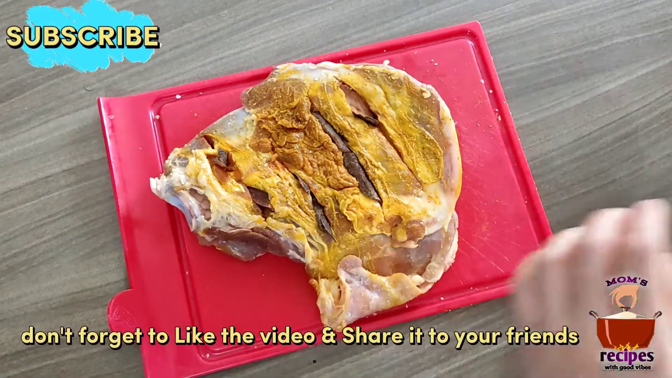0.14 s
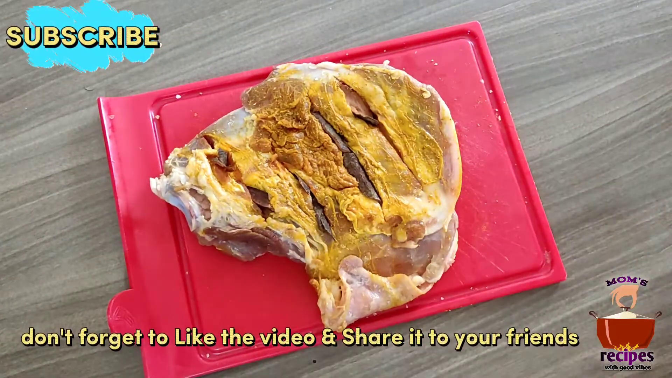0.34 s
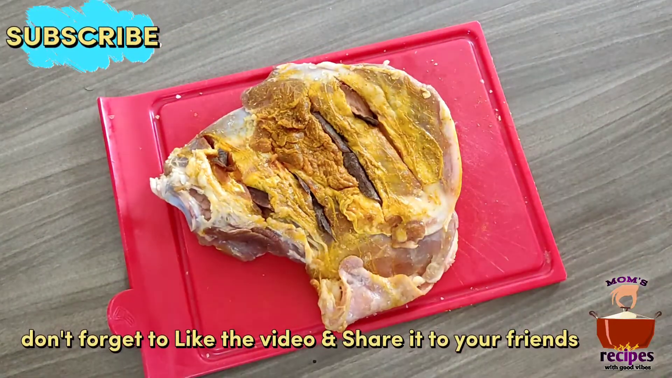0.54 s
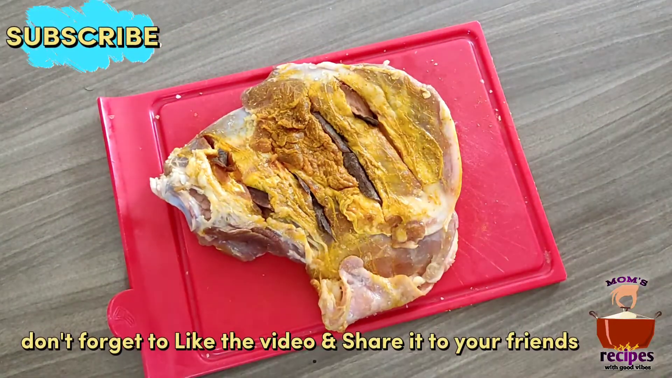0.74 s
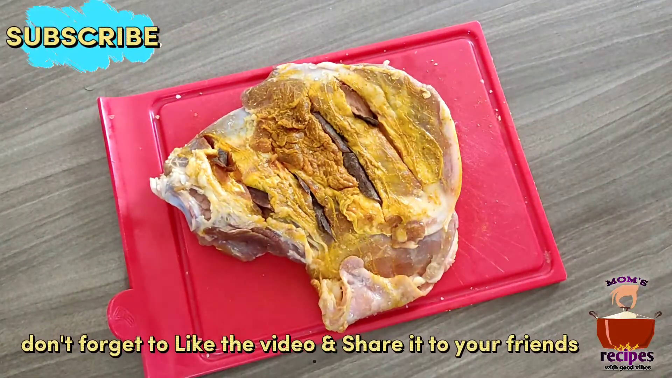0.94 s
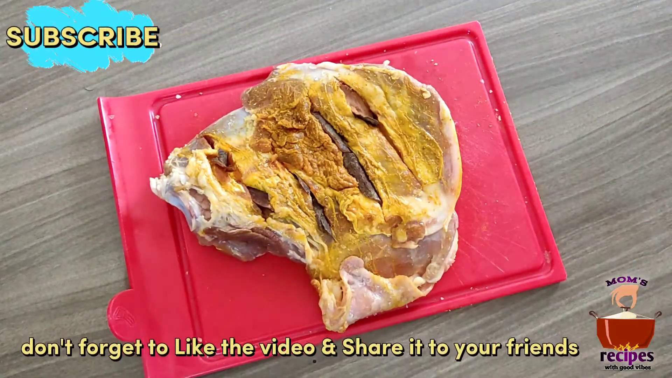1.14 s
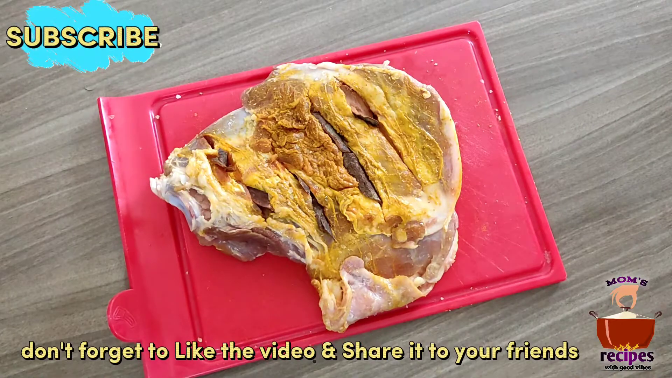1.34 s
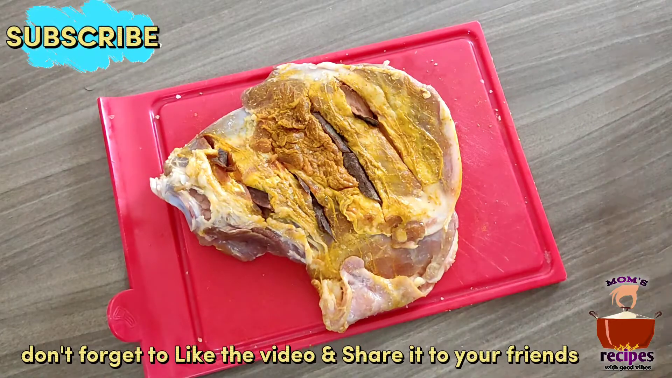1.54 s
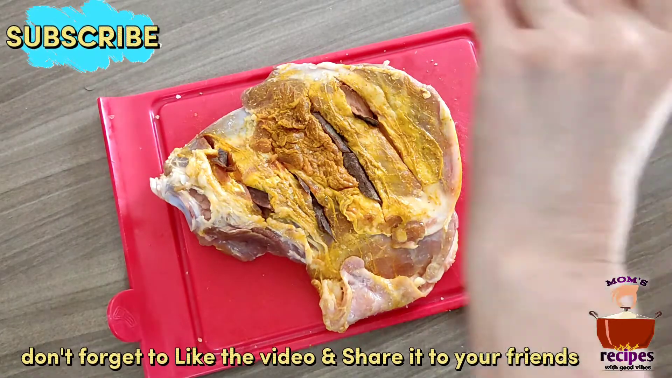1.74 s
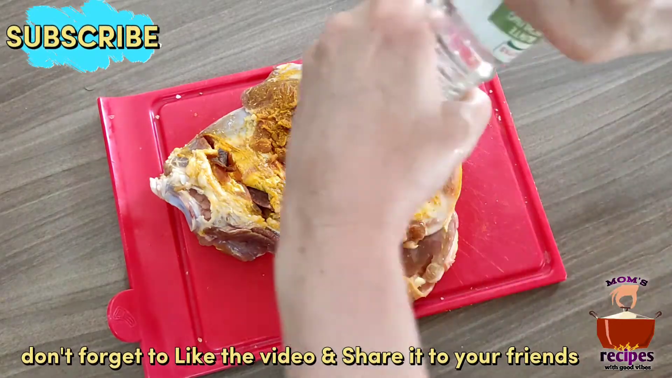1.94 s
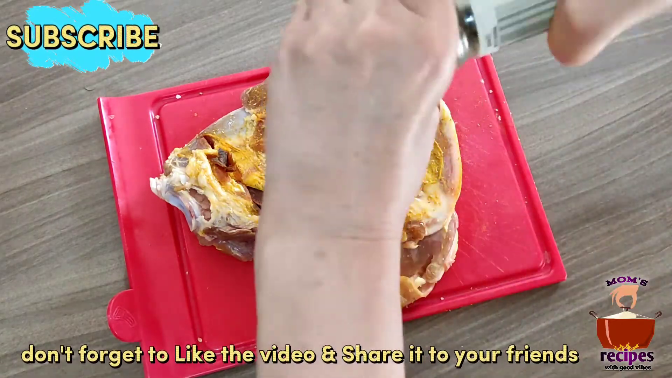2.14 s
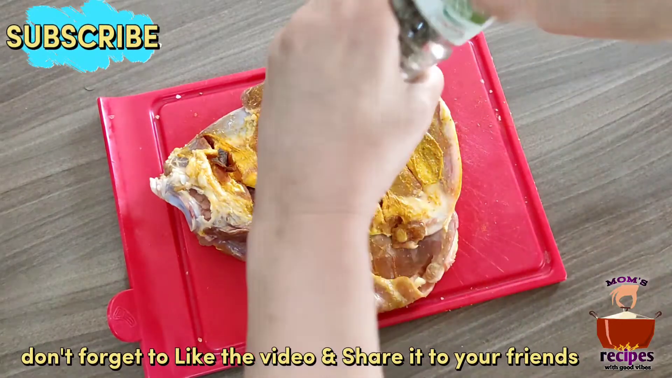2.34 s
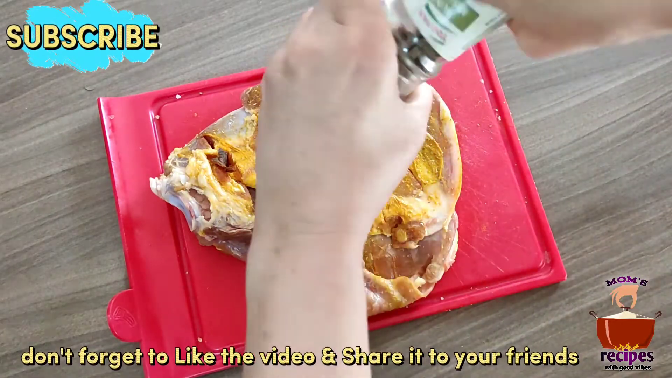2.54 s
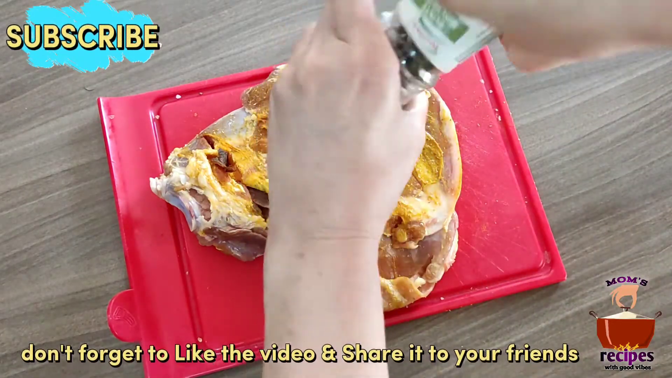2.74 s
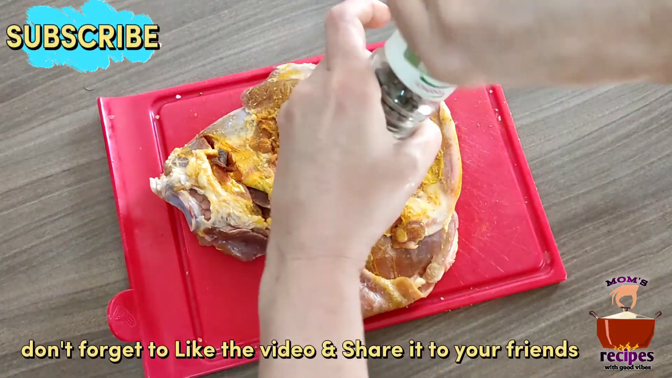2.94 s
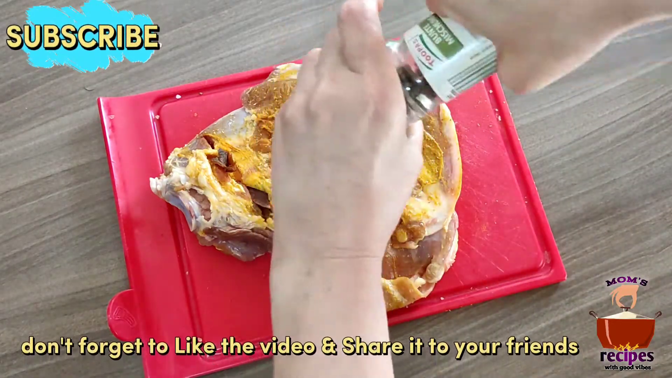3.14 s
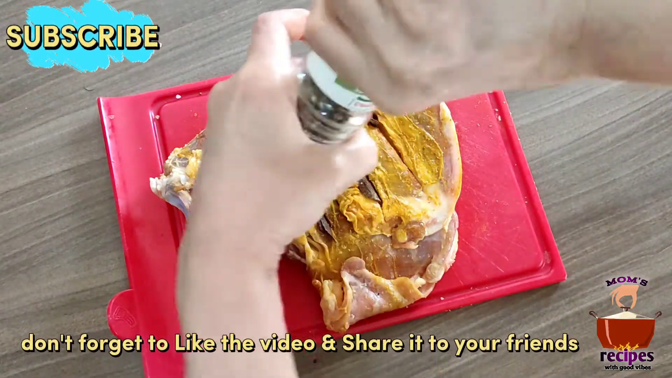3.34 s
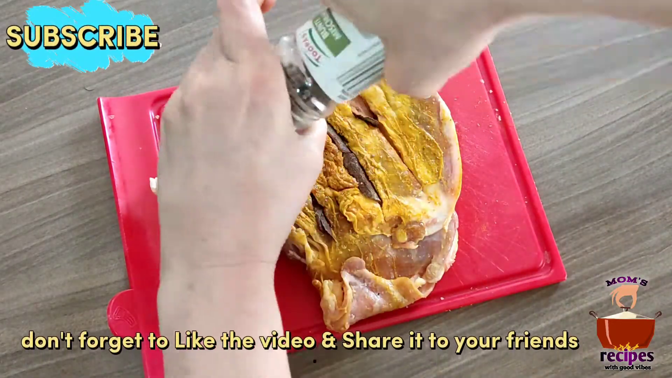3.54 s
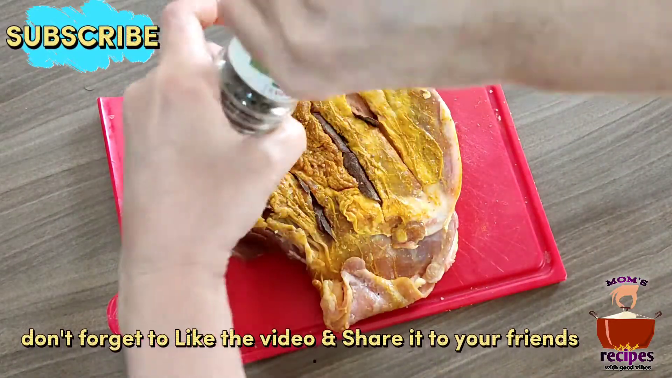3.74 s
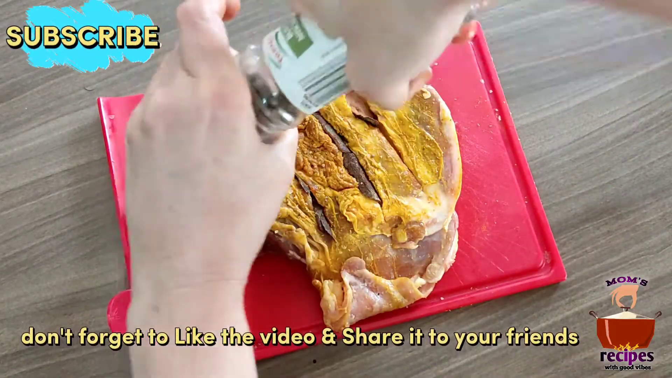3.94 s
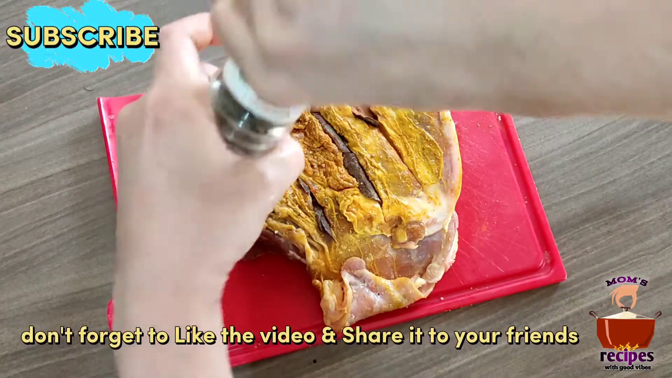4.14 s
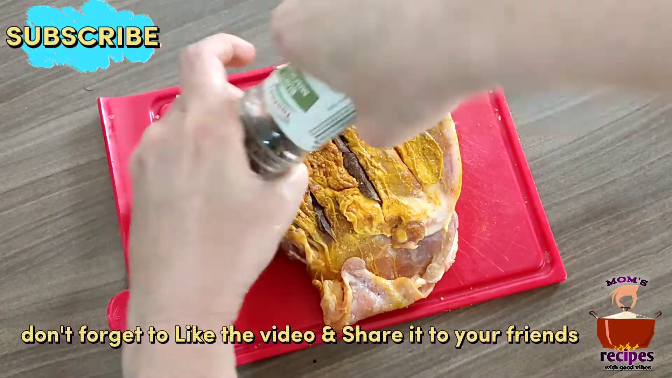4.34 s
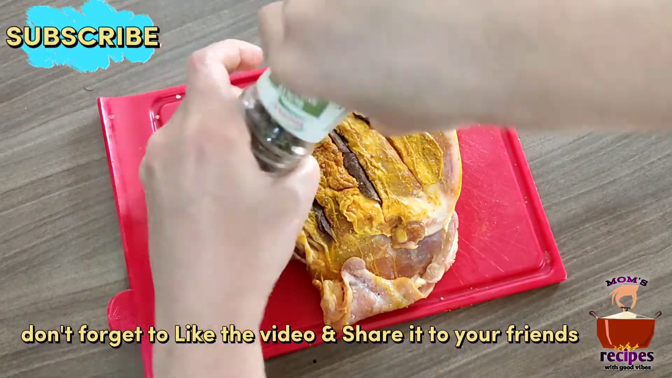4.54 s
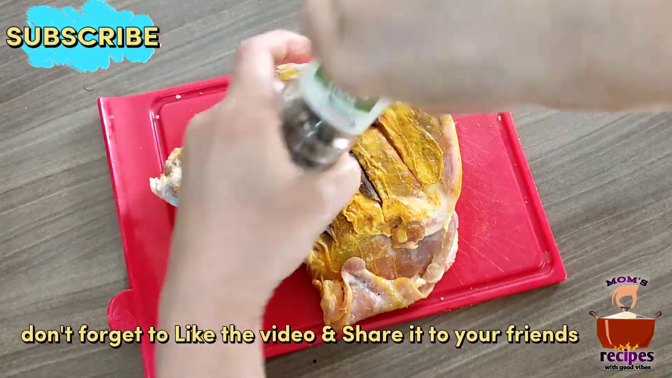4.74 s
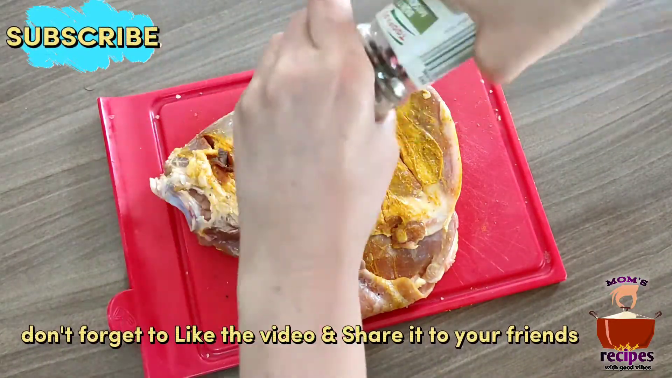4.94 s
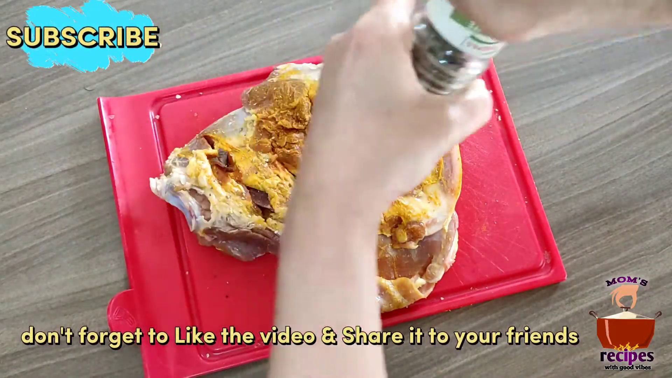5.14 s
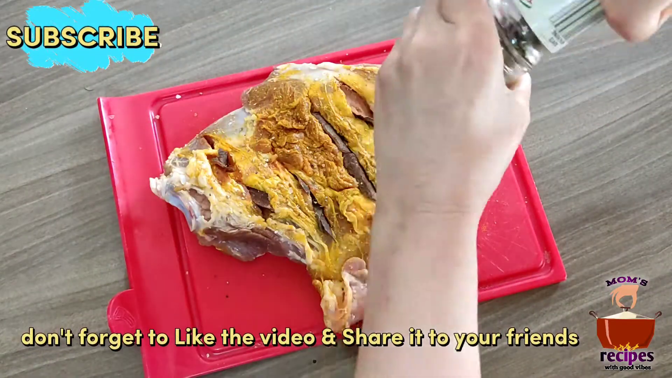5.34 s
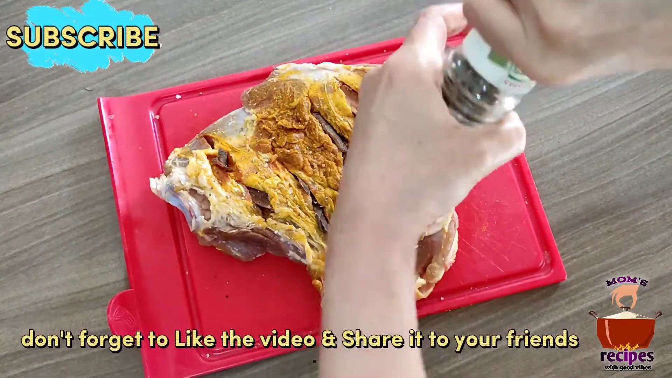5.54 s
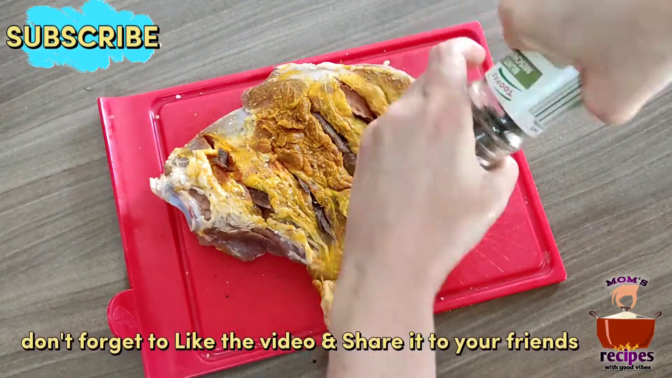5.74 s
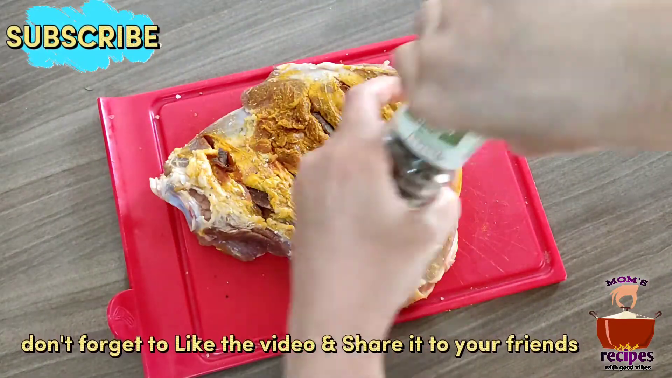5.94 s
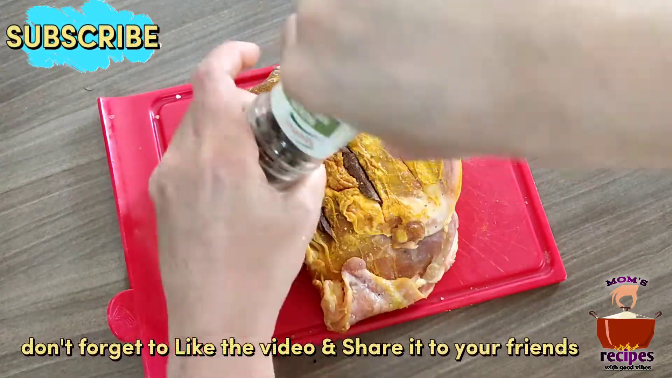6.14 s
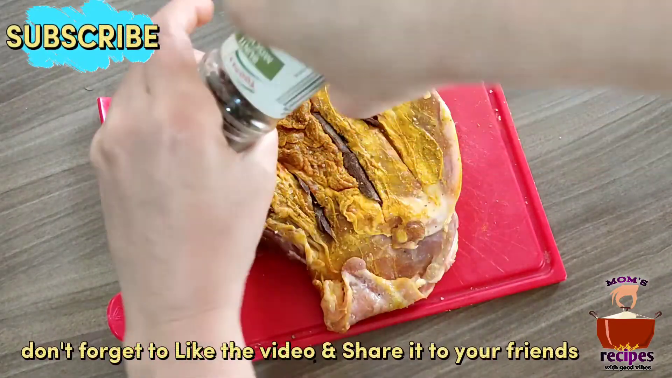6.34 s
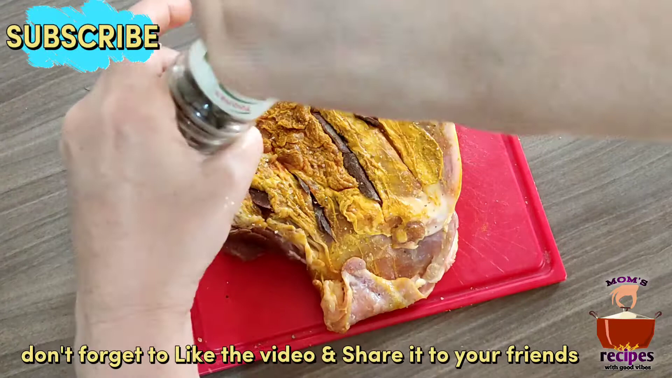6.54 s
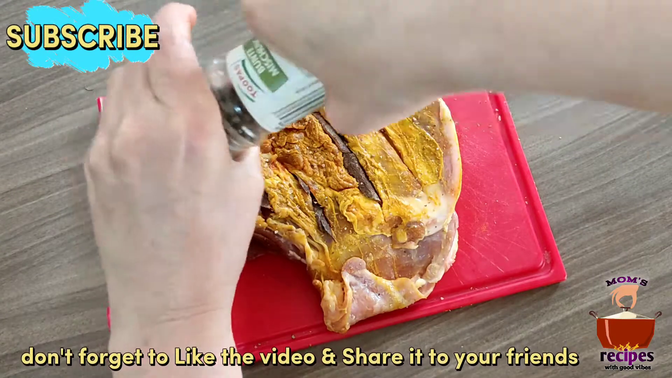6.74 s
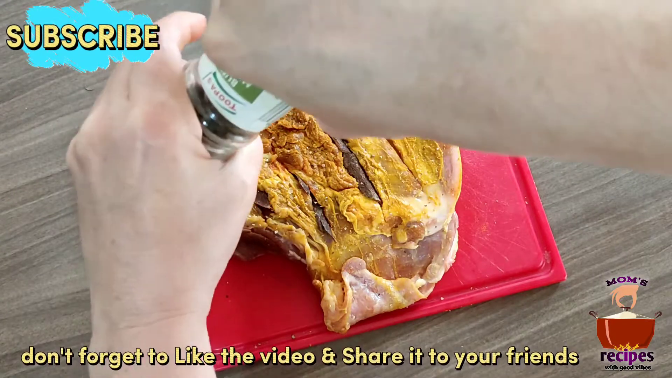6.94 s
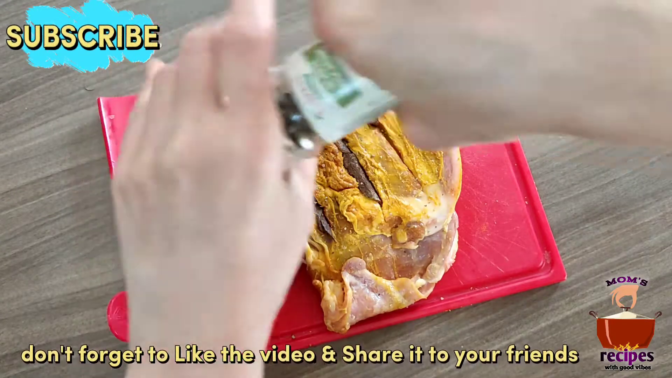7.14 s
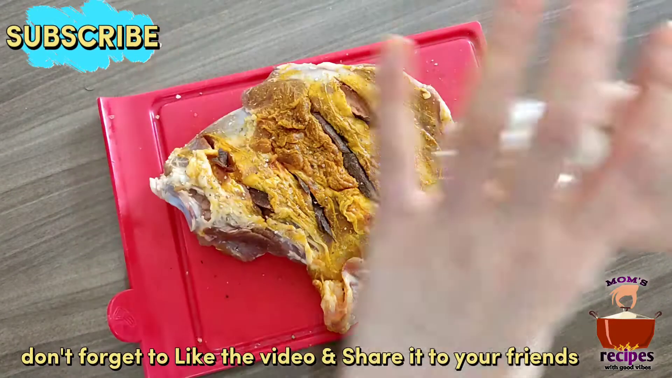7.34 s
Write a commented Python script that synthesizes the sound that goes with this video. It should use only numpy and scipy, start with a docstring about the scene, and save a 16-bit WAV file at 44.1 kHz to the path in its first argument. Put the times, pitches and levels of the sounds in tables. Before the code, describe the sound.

In a small kitchen, something lands with a soft thud on a worktop a little way off, and peppercorns shift faintly in a glass grinder. Then a hand twists the grinder back and forth close to the microphone, making fast, uneven runs of bright, brittle cracks with a fine gritty crunch beneath. The grinding ends with a few faint ticks. Low appliance rumble and slight hiss continue throughout.

```python
"""A hand twists a glass spice grinder over food in a small kitchen, close to a phone's two microphones.
Each peppercorn snaps, rings the plastic burr (the grinding teeth) and knocks the hollow jar, while
the fragments crumble in tiny grains. Before the twisting, something thuds onto a worktop farther off.
The worktop and walls echo, appliances rumble and the microphones hiss."""
import sys
import numpy as np
from scipy import signal
from scipy.fft import rfft, irfft, next_fast_len
from scipy.io import wavfile
from scipy.ndimage import uniform_filter1d

SR = 44100
rng = np.random.default_rng(int(sys.argv[2]) if len(sys.argv) > 2 else 0)


def wav_out(sig):
    """Save sig, one row per channel (or a flat mono array), as 16-bit PCM at SR to the path in sys.argv[1]."""
    wavfile.write(sys.argv[1], SR, np.round(np.clip(np.atleast_2d(sig).T, -1, 1) * 32767).astype(np.int16))


N = 325692

# The tone of the grinder's three sounds. Each row: frequency in Hz, relative level in dB.
SNAP_SPECTRUM = [(4120, -35), (7000, -3.5), (8550, 4), (9690, -4), (10900, -3.5), (12400, -10.5),
                 (13500, -16), (14200, -23), (16500, -75.5)]  # a brittle break, coloured by the ringing microphone openings
BURR_SPECTRUM = [(2290, -25.5), (3900, -16.5), (4830, -9), (5330, -2.5), (5810, 1), (6520, -4),
                 (7000, -4.5), (9100, -32.5), (15400, -120)]  # the plastic teeth
JAR_SPECTRUM = [(240, -48), (400, -28), (663, -12), (715, -15), (802, -9), (1270, -7), (1650, -1.5),
                (2930, -3.5), (3160, -3), (3900, -10), (5070, -13), (8580, -120)]  # the hollow jar and the hands
# How the phone's body shades the grinder. Each row: frequency in Hz, left level minus right in dB.
PHONE_SHADE = [(500, -1.5), (1300, 1.5), (2400, -1), (4400, -1.5), (6000, -2.5), (8500, -10), (10500, -0.5),
               (12500, 3.5), (15000, -5.5)]


def grinder():
    """Cracks and crumbs ring in the same three ways, then reach the two microphones unequally."""
    snap, burr, jar = cracks() + crumble()
    sound = ring(snap, SNAP_SPECTRUM) + ring(burr, BURR_SPECTRUM) + ring(jar, JAR_SPECTRUM)
    return filtered(sound, lambda hz: amp(along(PHONE_SHADE, hz) / 2 * [[1], [-1]]))


# Breaking peppercorns. Each row: start in seconds, snap level in dB, average jar and burr levels in dB
# above the snap, knock pitch in Hz, seconds the snap takes to fade by 60 dB (called t60).
CRACKS = [(1.1308, -34.5, -33, -31, 3510, 0.015), (1.1474, -34, -34, -16, 3250, 0.011),
          (1.1872, -19, -33, -20, 3080, 0.017), (1.5791, -27, -13.5, -16, 2210, 0.017),
          (1.6052, -6.5, -16, -23.5, 2210, 0.012), (1.705, -16.5, -17, -23, 2220, 0.015),
          (1.8545, -26.5, -7.5, -16, 2060, 0.023), (2.0059, -27, -28.5, -33, 1150, 0.013),
          (2.0299, -4.5, -17, -18, 1560, 0.014), (2.0745, -27, -19, -15, 1670, 0.017),
          (2.0808, -14.5, -14, -19, 1880, 0.017), (2.0929, -5.5, -15, -14.5, 1665, 0.013),
          (2.1251, -18.5, -11, -14, 1280, 0.015), (2.1358, -13, -11.5, -13, 1660, 0.015),
          (2.157, -24, -6, -14, 1620, 0.014), (2.1938, -31.5, -12, -7.5, 2010, 0.017),
          (2.2692, -26.5, -9, -21, 3200, 0.017), (2.2796, -17, -13.5, -21, 3130, 0.018),
          (2.3405, -19, -22, -17, 1700, 0.017), (2.3494, -20.5, -16, -19, 2100, 0.014),
          (2.3562, -17.5, -23.5, -18, 1580, 0.023), (2.4259, -30, -23, -21, 2440, 0.017),
          (2.4716, -29, -27, -23, 1980, 0.015), (2.483, -27, -17, -18, 3300, 0.014),
          (2.4939, -17.5, -19, -14, 2400, 0.017), (2.5124, -27, -16, -20, 1970, 0.019),
          (2.5218, -12, -22, -24, 1980, 0.027), (2.5528, -7, -16.5, -20, 2760, 0.021),
          (2.5829, -12, -14, -14.5, 2920, 0.034), (2.6017, -7.5, -16, -12.5, 3170, 0.018),
          (2.6188, -9.5, -13.5, -21, 2090, 0.023), (2.635, -12, -14, -11, 2440, 0.012),
          (2.7186, -33, -15, -9, 1710, 0.019), (2.7343, -25.5, -11, -10, 2390, 0.017),
          (2.7534, -20, -16, -10, 2030, 0.02), (2.761, -6.5, -20, -14.5, 3460, 0.015),
          (2.79, -7, -20, -11.5, 1220, 0.011), (2.9215, -27, -17, -17.5, 1570, 0.014),
          (2.9403, -13.5, -32, -12.5, 1600, 0.023), (2.9821, -23.5, -14, -16, 3200, 0.014),
          (3.028, -1.5, -24.5, -18, 2505, 0.019), (3.0458, -15.5, -20, -19, 2370, 0.012),
          (3.2052, -24.5, -29, -22, 2420, 0.015), (3.2475, -19.5, -32.5, -13, 1200, 0.017),
          (3.261, -7, -25, -17.5, 1570, 0.018), (3.3822, -33.5, -24, -19, 1320, 0.017),
          (3.4125, -24.5, -25, -10.5, 2090, 0.023), (3.4248, -21, -24, -14, 1670, 0.019),
          (3.4352, -16.5, -22, -14, 2310, 0.017), (3.444, -22.5, -14, -9, 1890, 0.029),
          (3.471, -1.5, -23.5, -23.5, 2470, 0.014), (3.4981, -21, -11, -16, 1630, 0.023),
          (3.5134, -22, -17, -16, 2120, 0.019), (3.6483, -30.5, -10, -11.5, 2700, 0.013),
          (3.683, -44, -12, 4, 1680, 0.02), (3.709, -12.5, -16, -11, 2325, 0.014),
          (3.8262, -33, -27, -4.5, 1710, 0.022), (3.8533, -14, -35, -5.5, 3470, 0.01),
          (3.8652, -7, -24, -14, 1640, 0.013), (3.8854, -16, -22, -18, 1890, 0.017),
          (3.904, -12, -26, -25, 2680, 0.012), (3.91, -13, -28, -19, 2460, 0.016),
          (3.9396, -28.5, -7, -6, 2170, 0.015), (4.0606, -9, -28, -12, 1620, 0.017),
          (4.0744, -26, -14.5, -22, 1050, 0.017), (4.1004, -24.5, -11, -10, 1940, 0.019),
          (4.1094, -12.5, -18, -25, 1900, 0.024), (4.135, -37, -6, 5, 1880, 0.017),
          (4.1654, -13.5, -15, -3.5, 1620, 0.013), (4.2641, -10, -21.5, -14.5, 2840, 0.017),
          (4.2852, -7.5, -24, -18, 1870, 0.011), (4.3005, -5.5, -27, -16.5, 1900, 0.013),
          (4.3132, -8.5, -23, -12, 1850, 0.0097), (4.3197, -17, -21, -17, 2000, 0.013),
          (4.3262, -17.5, -12, -16, 1860, 0.014), (4.373, -26, -12.5, -10, 1890, 0.019),
          (4.3879, -21, -22.5, -13.5, 1960, 0.026), (4.4284, -30, -20, -16, 2070, 0.014),
          (4.4777, -37.5, -22, -14, 1870, 0.017), (4.5116, -19, -22, -20, 1930, 0.019),
          (4.5211, -14.5, -16, -17, 1890, 0.016), (4.5655, -12, -24.5, -16, 1107, 0.017),
          (4.5715, -16, -21.5, -23, 2220, 0.019), (4.6224, -26.5, -34, -18, 1710, 0.017),
          (4.6525, -30.5, -41, -25, 1760, 0.016), (4.7263, -21, -11.5, -17, 1360, 0.025),
          (4.7335, -12, -20, -13, 1860, 0.014), (4.7455, -20, -16, -18, 2100, 0.019),
          (4.7573, -10, -21.5, -17, 2080, 0.021), (4.7925, -10.5, -18.5, -19, 2120, 0.024),
          (4.812, -12.5, -18, -11.5, 2080, 0.014), (4.8313, -22.5, -14, -7, 2170, 0.017),
          (4.8794, -13.5, -28, -16.5, 2350, 0.02), (5.014, -17.5, -19.5, -12.5, 2350, 0.016),
          (5.0453, -28, -11, -7, 2090, 0.014), (5.0687, -16.5, -19.5, -13.5, 2240, 0.019),
          (5.1937, -24, -7.5, -11, 1960, 0.018), (5.2187, -10, -19.5, -19, 2420, 0.012),
          (5.253, -3, -21, -21.5, 3260, 0.021), (5.3274, -33.5, -13.5, -11, 1890, 0.015),
          (5.3735, -32, -31, -23, 2250, 0.021), (5.4304, -29.5, -16, -8.5, 2450, 0.015),
          (5.452, -16.5, -26, -9.5, 1710, 0.013), (5.4768, -23, -19, -8, 2880, 0.021),
          (5.4866, -19.5, -22, -13, 2400, 0.019), (5.5066, -19, -39, -12, 1910, 0.02),
          (5.6232, -26.5, -48, -20, 2430, 0.024), (5.632, -26, -23, -15, 2540, 0.017),
          (5.6506, -28, -23, -20, 1530, 0.017), (5.6627, -21, -33, -8, 3100, 0.024),
          (5.676, -8.5, -47, -21.5, 2690, 0.014), (5.6851, -12.5, -27, -14, 1960, 0.02),
          (5.6966, -14, -34, -10, 2130, 0.021), (5.7232, -17.5, -19, -12.5, 3080, 0.017),
          (5.7384, -20.5, -16.5, -7, 1650, 0.022), (5.758, -20, -17, -8, 3500, 0.015),
          (5.788, -22.5, -16, -14, 2360, 0.017), (5.7993, -27, -16.5, -12, 1700, 0.017),
          (5.9054, -28.5, -19, -5, 2040, 0.017), (5.911, -23, -24, -9.5, 2270, 0.017),
          (5.9171, -11.5, -34, -10, 1910, 0.017), (5.9517, -24.5, -7, -8, 3200, 0.01),
          (5.9809, -31, -24, -12, 2240, 0.019), (6.1, -24.5, -19, -25.5, 2160, 0.015),
          (6.1151, -25.5, -8.5, -20.5, 1920, 0.014), (6.124, -23, -14.5, -15, 1400, 0.026),
          (6.1498, -6.5, -19.5, -19.5, 2160, 0.015), (6.1777, -13, -17, -15, 1900, 0.01),
          (6.2675, -27, -20, -13.5, 1650, 0.01), (6.351, -29.5, -16, -8, 2170, 0.017),
          (6.3614, -27, -17, -9, 1400, 0.018), (6.4104, -22.5, -12.5, -21, 1080, 0.017),
          (6.4144, -25, -16, -19, 1830, 0.013), (6.435, -25.5, -17, -12, 2550, 0.021),
          (6.544, -13, -22.5, -14.5, 1510, 0.018), (6.57, -18.5, -30, -17, 1710, 0.016),
          (6.5862, -6.5, -26, -17.5, 1930, 0.022), (6.766, -37.5, -14, -19, 2820, 0.015),
          (6.8336, -36, -18, -21, 2720, 0.017), (7.1638, -40.5, -27, -31, 1810, 0.016)]


def cracks():
    """Each peppercorn that breaks snaps, rings the burr and knocks the jar, at a pitch set by the grip."""
    start, db, jar_db, burr_db, jar_hz, t60 = np.transpose(CRACKS)
    pan_db = 5 + 0.16 * db - 2 * rng.standard_normal(len(start))  # louder cracks lean left
    burr_peak_db = db + burr_db + 9  # a ring starts above its average level
    jar_peak_db = db + jar_db + 5.5
    snap = bursts(start, db, pan_db, t60, alike=0.11, samples=1500, rough_db=0.7, spike=0.66)
    burr = bursts(start, burr_peak_db, pan_db * 0.44, t60 * 0.8, alike=0.33, samples=1500,
                  rough_db=1.5, spike=0.73)
    jar = bursts(start, jar_peak_db, pan_db * 0.37, t60 * 0.9, alike=0.37, samples=1500,
                 rough_db=5.0, spike=0.58, knock_hz=jar_hz, knock_db=-15.5)
    return np.array([snap, burr, jar])


def crumble(count=5500):
    """Fragments grind between the teeth: many tiny grains, louder when the hand works harder."""
    when, smallness, brightness, pan = rng.random((count, 4)).T
    start = when * N / SR
    db = effort_db(start) - 12 - 4 * np.log(smallness + 0.061)
    pan_db = 6 * (pan - 0.5)
    bright_db = 8 * (brightness - 0.5)  # more burr, less jar
    snap = bursts(start, db, pan_db, t60=0.0086, alike=0.98, samples=200)
    burr = bursts(start, db - 9.5 + bright_db, pan_db, t60=0.016, alike=0.5, samples=200)
    jar = bursts(start, db - 8 - bright_db, pan_db, t60=0.011, alike=0.37, samples=200)
    return np.array([snap, burr, jar])


# Hand movements. Each row: start in seconds, length in seconds, relative crumble level in dB.
TWISTS = [(1.598, 0.15, -36), (1.833, 0.041, -33.5), (2.025, 0.15, -30.5), (2.264, .1, -30.5),
          (2.5, 0.082, -19.5), (2.74, .05, -29), (2.937, 0.032, -25.5), (3.047, .03, -32),
          (3.236, 0.056, -28.5), (3.415, 0.074, -22.5), (3.657, 0.068, -27.5), (3.852, 0.064, -23.5),
          (4.074, 0.056, -25.5), (4.276, 0.049, -22), (4.509, .06, -26.5), (4.742, .1, -26),
          (4.935, 0.088, -28), (5.174, 0.11, -30.5), (5.443, 0.032, -24), (5.655, 0.11, -23.5),
          (5.901, 0.063, -33.5), (6.096, 0.17, -32.5), (6.312, 0.13, -32.5), (6.539, 0.034, -33)]  # the wrist turns
HANDLING = [(0.1, 0.025, -52), (0.587, 0.04, -42.5), (0.737, 0.044, -44), (.9, 0.28, -52.5),
            (1.112, 0.16, -46), (1.318, 0.043, -48.5), (6.756, 0.014, -50), (6.83, 0.023, -47),
            (7.163, .03, -46.5), (7.35, .03, -48.5)]  # the jar is moved and the corns shift inside


def effort_db(times, rise_db_per_s=897, fall_db_per_s=307, trickle_db_per_s=58):
    """Each movement rises fast, holds, falls away and leaves loose fragments trickling."""
    start, length, db = np.transpose(TWISTS + HANDLING)[:, :, None]
    before = np.maximum(start - times, 0)
    after = np.maximum(times - start - length, 0)
    rise = amp(db - rise_db_per_s * before)
    fall = amp(-fall_db_per_s * after) + amp(-14 - trickle_db_per_s * after)
    return 10 * np.log10(np.sum((rise * fall) ** 2, axis=0) + 1e-12)


# The left microphone hears the grinder late. Each row: time in seconds, delay in milliseconds.
LEFT_DELAY = [(0, 0.5), (1.6, 0.22), (2.3, 0.18), (3.2, 0.071), (4.6, 0.062), (5.2, 0.2), (5.7, 0.022),
              (7.39, 0.092)]


def bursts(start, db, pan_db, t60, alike, samples, rough_db=0, spike=0, knock_hz=0, knock_db=-99):
    """Each break is fading noise with an optional knock tone; alike is the share both sides hear."""
    t = np.arange(samples) / SR
    t60 = np.reshape(t60, (-1, 1))
    shared, left, right, grit = rng.standard_normal((len(start), 4, samples)).transpose(1, 0, 2)
    waver = 1 + 0.81 * wobble(shared[::-1], 110)  # a damped hollow rings unevenly
    tone = np.sin(2 * np.pi * np.reshape(knock_hz, (-1, 1)) * t)
    knock = waver * amp(knock_db - 60 * t / 0.035) * tone
    attack = 1 - np.exp(-(t + 1 / SR) / (0.071 * t60))  # a slow break also starts softly
    fade = attack * amp(-60 * t / t60) + spike * amp(-60 * t / 0.003)  # spike: the shell splits at once
    jerky = fade * amp(rough_db * wobble(grit, 30))  # it gives way in jerks
    jerky *= np.sqrt(np.sum(fade ** 2, axis=1) / np.sum(jerky ** 2, axis=1))[:, None]  # same energy
    delay_s = over_time(LEFT_DELAY, start) / 1000
    out = []
    for own, side in ((left, 1), (right, -1)):
        noise = np.sqrt(alike) * shared + np.sqrt(1 - alike) * own
        wave = (knock + noise * jerky) * amp(db + side * pan_db / 2)[:, None]
        first = np.round((start + side * delay_s / 2) * SR).astype(int).clip(0)
        positions = first[:, None] + np.arange(samples)
        out.append(np.bincount(positions.ravel(), wave.ravel(), N + samples)[:N])  # add them all up
    return np.array(out)


# Bumps on the worktop. Each row: start in seconds, relative level in dB, hardness in dB.
BUMPS = [(0.723, -30.5, -7.5), (0.736, -28, -0.5), (.746, -24, -3.5), (0.756, -32.5, 5), (0.766, -44, -11)]
# The worktop's own tones. Each row: pitch in Hz, relative level in dB, seconds to fade by 60 dB.
WORKTOP_TONES = [(213, -4.5, 0.12), (287, 1, 0.058), (390, 2, 0.062), (522, -0.5, 0.06), (557, 2, 0.06),
                 (704, 2.5, 0.072), (823, -0.5, 0.066), (1080, -3, 0.044), (1307, -11, 0.053),
                 (1610, -5, 0.032), (2170, -31, .03)]


def thud():
    """Something heavy settles on the worktop in a few bumps; harder ones ring brighter and puff more."""
    out = np.zeros(N + SR)
    t = np.arange(SR // 3) / SR
    hz, tone_db, t60 = np.transpose(WORKTOP_TONES)[:, :, None]
    attack = 1 - np.exp(-t / 0.00092)
    for start, db, hard_db in BUMPS:
        strength = amp(tone_db + 0.93 * hard_db * np.log2(hz / 400) + rng.normal(0, 1.6, hz.shape))
        rattle = 1 + 0.35 * wobble(rng.standard_normal((len(hz), len(t))), 500)
        tones = np.sin(2 * np.pi * (hz * t + rng.random(hz.shape)))
        ringing = np.sum(strength * rattle * amp(-60 * t / t60) * tones, axis=0)
        dull_noise = np.convolve(rng.standard_normal(len(t)), np.hanning(16) / 8, "same")
        puff = dull_noise * amp(hard_db + 6 - 60 * t / 0.03)
        out[round(start * SR):][:len(t)] += amp(db - 12) * (ringing + puff) * attack
    return out[:N] * amp([[-1.1], [1.1]])  # a little to the right


# How long the kitchen rings. Each row: frequency in Hz, seconds to fade by 60 dB.
ROOM_FADE = [(300, 0.39), (1500, 0.54), (5000, 0.36), (12000, 0.26)]
# Echoes off near surfaces. Each row: rough delay in milliseconds, level in dB.
ECHOES = [(2.2, -23), (4.4, -7), (7.5, -15), (11, -15.5), (17, -18.5)]


def kitchen(sound, tail_db, versions=1):
    """Adds a few echoes and a smooth tail; cycles through random versions to avoid steady ringing."""
    version = np.arange(N) // (SR // 9) % versions  # nine steps a second
    out = 0
    for k in range(versions):
        hz, t, noise = signal.stft(rng.standard_normal((2, SR // 2)), SR, nperseg=256)
        tail = signal.istft(noise * amp(-60 * t / along(ROOM_FADE, hz)[:, None]), SR, nperseg=256)[1]
        room = np.pad(amp(tail_db) * tail / np.linalg.norm(tail[0]), ((0, 0), (220, 0)))  # 5 ms late
        room[:, 0] = 1  # the direct sound
        for ms, db in ECHOES:
            for side, stretch in enumerate(rng.uniform(0.74, 1.07, 2)):
                room[side, round(ms * stretch * SR / 1000)] += amp(db)
        out = out + signal.fftconvolve(sound * (version == k), room, axes=1)[:, :N]
    return out


# The rumble drifts. Each row: time in seconds, relative level in dB.
RUMBLE_LEVEL = [(0.0, -52.5), (2.8, -52.5), (3.0, -54.5), (4.65, -52), (5.99, -54), (6.09, -55.5),
                (7.03, -52.5), (7.39, -53)]
# The tone of the two background noises. Each row: frequency in Hz, relative level in dB.
RUMBLE_SPECTRUM = [(8.8, -34), (15, 2.5), (70, -1.5), (135, -12), (163, -13), (206, -9.5), (378, -17),
                   (422, -17.5), (507, -18), (632, -22.5), (680, -20.5), (731, -23.5), (1200, -30),
                   (1560, -63), (2640, -120)]
HISS_SPECTRUM = [(530, -29), (900, -9.5), (1140, -8), (1550, -9.5), (1680, -8.5), (1800, -10), (2250, -11),
                 (2990, -14.5), (4850, -12.5), (5320, -15), (6130, -18), (8830, -8), (13700, -17.5),
                 (14500, -32.5), (15000, -41)]


def background():
    """Appliances rumble and the microphones hiss."""
    rumble = amp(over_time(RUMBLE_LEVEL, np.arange(N) / SR) + 2) * steady_noise(RUMBLE_SPECTRUM)
    hiss = amp(-61) * steady_noise(HISS_SPECTRUM)
    return rumble + hiss


# How alike left and right are. Each row: frequency in Hz, likeness (1 same, 0 unrelated, -1 opposite).
LIKENESS = [(60, 0.79), (180, 0.87), (550, 0.48), (1650, -0.31), (4970, 0.079), (15000, 0.0)]


def steady_noise(spectrum):
    """Even stereo noise whose two sides are alike only in the bass."""
    def gains(hz):
        angle = np.arccos(along(LIKENESS, hz)) / 2
        return amp(along(spectrum, hz)) * [np.cos(angle), np.sin(angle)]
    mid, side = filtered(rng.standard_normal((2, N)), gains)
    return unit(np.array([mid + side, mid - side]))


def amp(db):
    """Turns decibels into a gain."""
    return 10 ** (np.asarray(db) / 20)


def unit(x):
    """Scales x to an average power of 1."""
    return x / np.sqrt(np.mean(x ** 2) + 1e-20)


def wobble(noise, samples):
    """Smooths each row of noise into a slower wobble."""
    return unit(uniform_filter1d(noise, size=samples, axis=1))


def along(rows, hz):
    """Reads a table between its frequencies, on a musical (log) scale."""
    row_hz, values = np.transpose(rows)
    return np.interp(np.log(hz + 1), np.log(row_hz + 1), values)


def over_time(rows, times):
    """Reads a table between its times."""
    return np.interp(times, *np.transpose(rows))


def filtered(x, gains):
    """Scales each frequency in x by gains(hz)."""
    size = next_fast_len(N + SR // 2)
    return irfft(rfft(x, size) * gains(np.fft.rfftfreq(size, 1 / SR)), size)[..., :N]


def ring(x, spectrum, size=2048):
    """Plays x through a ringing body that has this spectrum."""
    gains = amp(along(spectrum, np.fft.rfftfreq(size, 1 / SR)))
    cepstrum = irfft(np.log(gains + 1e-4), size)
    cepstrum[1:size // 2] *= 2  # fold it forward, so the ring never comes before the hit
    cepstrum[size // 2 + 1:] = 0
    response = irfft(np.exp(rfft(cepstrum)), size)
    return signal.fftconvolve(x, response[None] / np.linalg.norm(response), axes=1)[:, :N]


def scene():
    """The close grinder and the farther, more echoing thud, over the background."""
    return kitchen(grinder(), tail_db=-11, versions=5) + kitchen(thud(), tail_db=2.5) + background()


def record(dry, ceiling=0.95, top_hz=16600):
    """The phone gently squashes the loudest cracks and cuts the highest treble."""
    squashed = dry / (1 + np.abs(dry / ceiling) ** 6) ** (1 / 6)
    return filtered(squashed, lambda hz: hz < top_hz)


dry = scene()
out = record(dry)
wav_out(out)
```